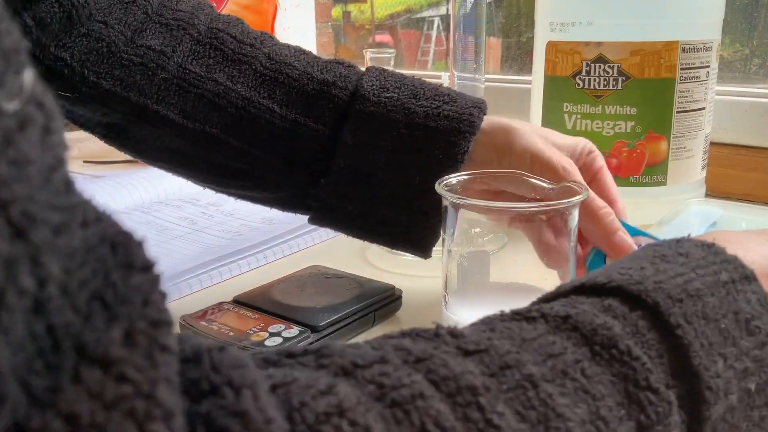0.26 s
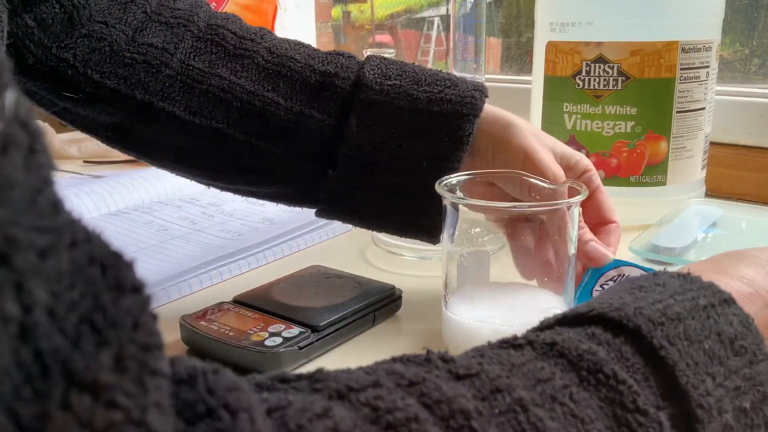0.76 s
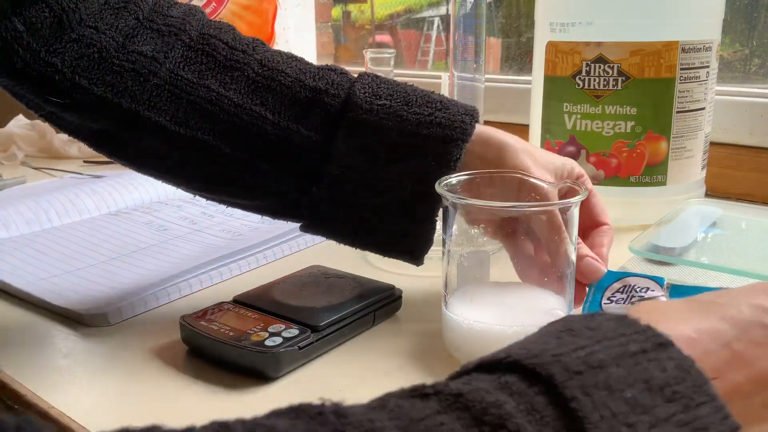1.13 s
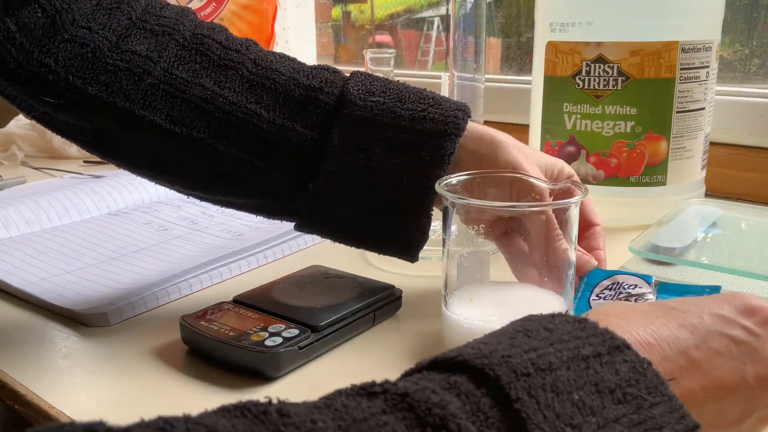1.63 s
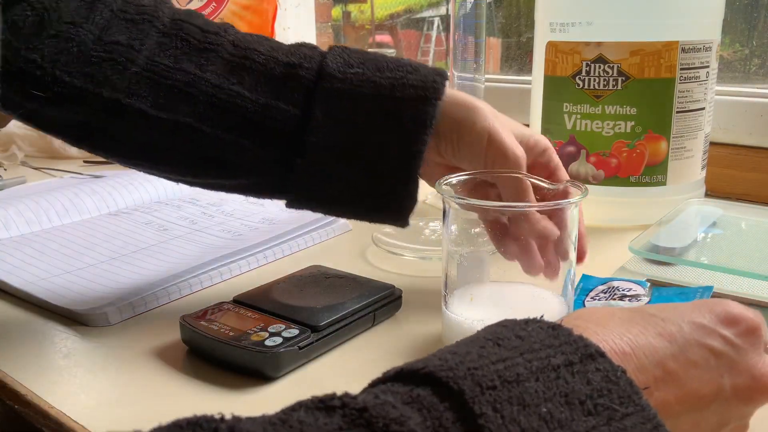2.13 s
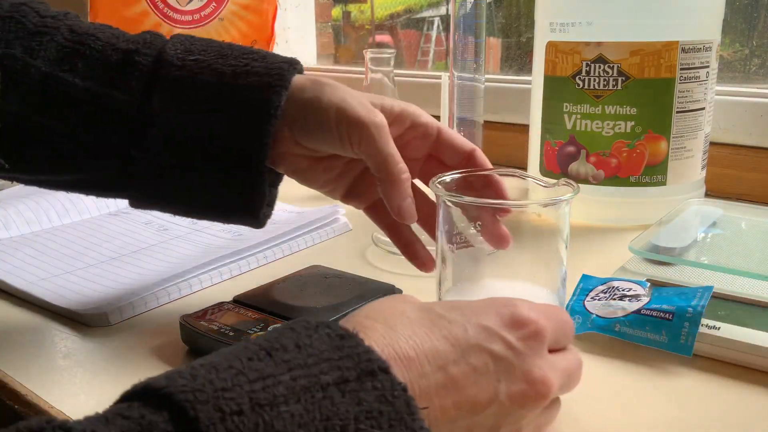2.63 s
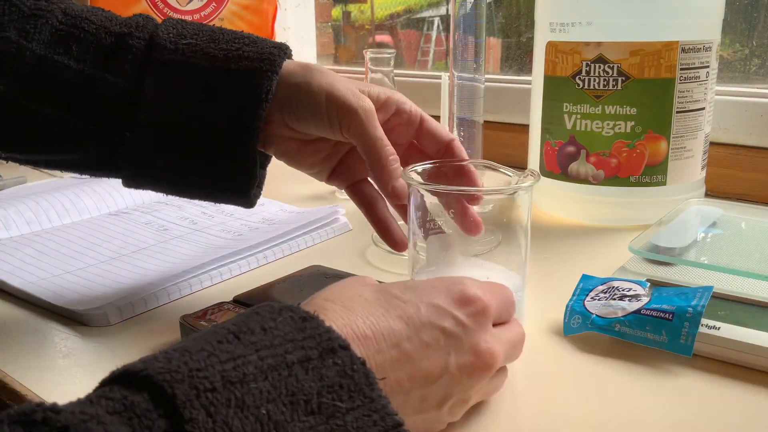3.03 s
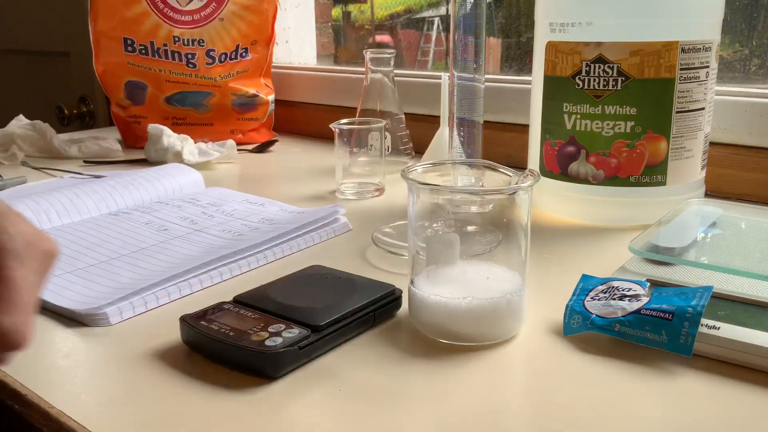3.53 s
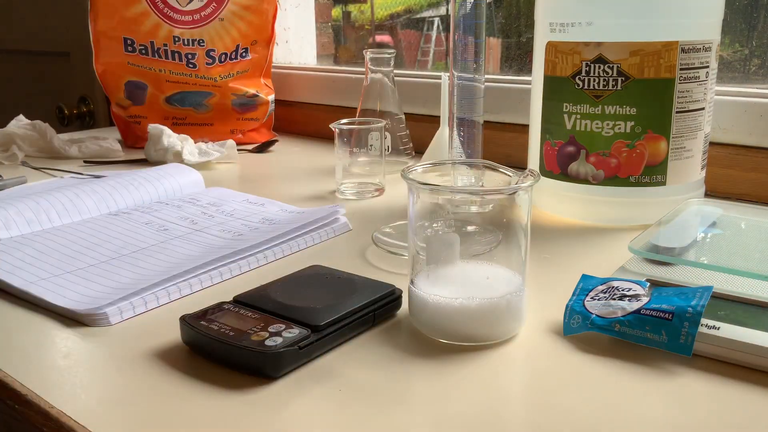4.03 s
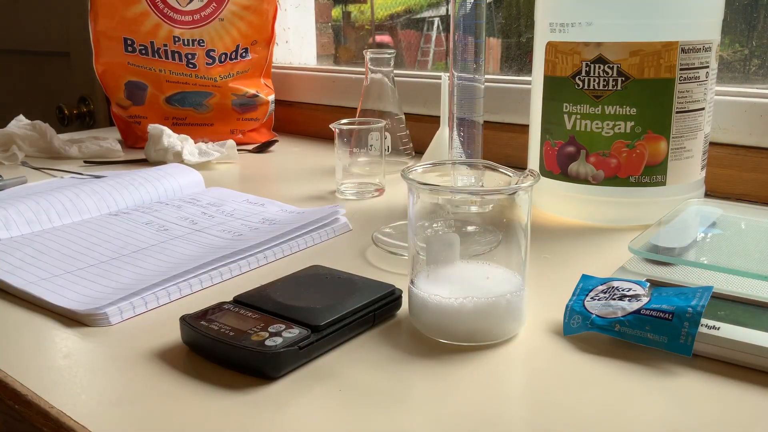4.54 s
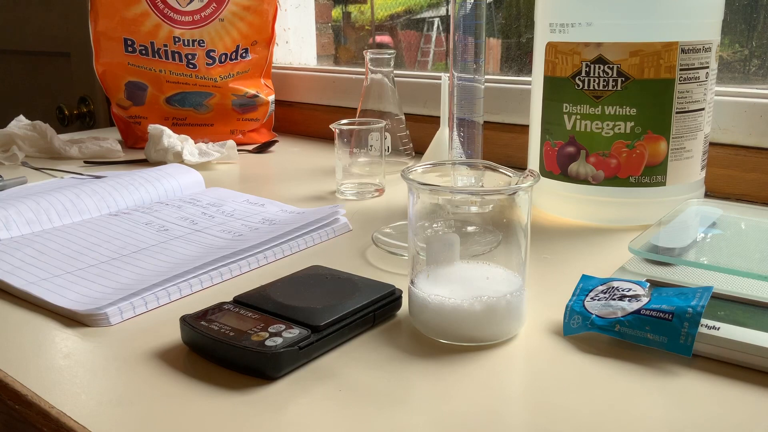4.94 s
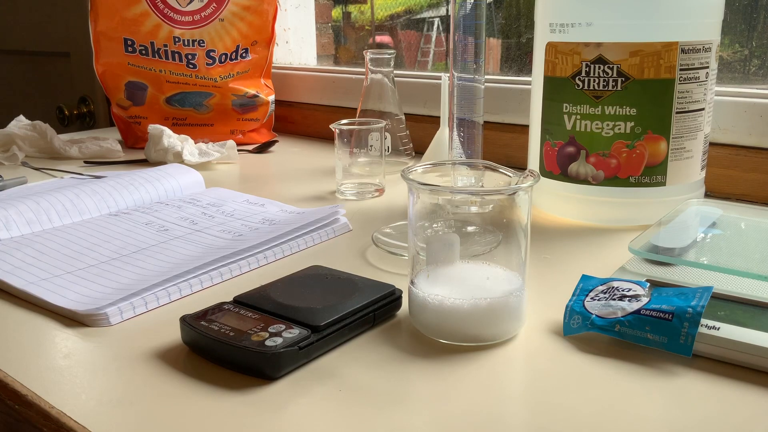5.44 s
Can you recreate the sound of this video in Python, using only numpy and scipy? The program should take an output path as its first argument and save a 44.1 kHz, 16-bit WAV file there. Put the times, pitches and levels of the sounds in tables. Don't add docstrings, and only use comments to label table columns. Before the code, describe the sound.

Fine powder fizzes softly in a glass beaker over a low appliance hum, with faint foil crackles, a brief slide, and one sharp knock.

```python
import sys
import numpy as np
from scipy import signal
from scipy.fft import rfft, irfft, next_fast_len
from scipy.io import wavfile
from scipy.ndimage import uniform_filter1d

SR = 44100
rng = np.random.default_rng(int(sys.argv[2]) if len(sys.argv) > 2 else 0)


def field_ratio(decibels):
    return 10 ** (np.asarray(decibels, dtype=float) / 20)


def int16_out(signal):
    q = np.round(np.clip(np.atleast_2d(signal).T, -1, 1) * 32767)
    wavfile.write(sys.argv[1], SR, q.astype(np.int16))


N = 250929
SIZE = next_fast_len(N + SR)
HZ = np.maximum(np.arange(SIZE // 2 + 1) * SR / SIZE, 1)
TIME = np.arange(N) / SR


# start in seconds, level of the low body in dB,
# level of the small bright parts in dB.
CONTACTS = [(4.431, -28, -50), (4.4365, -30, -55), (4.4425, -26, -45), (4.4559, -0.5, -13),
            (4.4605, -26, 0), (4.4655, -22, -6), (4.473, -17, -9), (4.4785, -22, -10), (4.4845, -25, -16),
            (4.493, -27, -25), (4.509, -29, -26), (4.516, -31, -28), (4.548, -31, -34), (4.576, -30, -38)]
# frequency in Hz, left level in dB, right level in dB, T60 in seconds.
BODY_MODES = [(111, -36, -37, 0.15), (212, -39, -38, .14), (290, -47, -43, .15), (355, -42, -38, .25),
              (420, -47, -44, .25), (540, -18, -28, .06), (584, -16, -30, .065), (605, -42, -32, .3),
              (640, -13, -17, .06), (785, -25, -21, 0.07), (860, -22, -20, .06), (925, -2.5, -2.5, .012),
              (985, -40, -39, .15), (1195, -22, -20, .06), (1600, -24, -37, .04), (1873, -44, -45, .05),
              (2130, -36, -34.5, 0.085), (2750, -44, -38, .03), (3250, -34, -31, 0.039),
              (3700, -34, -33, 0.02), (4115, -29, -29, .035), (4300, -38, -38, .09), (5760, -43, -35, .065),
              (6500, -45, -31, .045), (7150, -44, -36, .05), (8580, -23, -30, .1)]
# frequency in Hz, level in dB.
RATTLE_COLOUR = [(150, -12), (300, -15), (450, -10), (700, -6), (1100, 2), (1500, -6), (2500, -8),
                 (4000, -10), (6000, -20), (8500, -19), (11000, -23.5), (15500, -40)]


def knock():
    near, out = window(4.4, .5), np.zeros((2, N))
    when, low_db, bright_db = np.transpose(CONTACTS)
    at = np.round(when * SR).astype(int) - near.start
    soft_db = -5 * (when < 4.45)
    for hz, left, right, t60 in BODY_MODES:
        heavy, booming = hz < 1400, hz < 450
        lag = int(.001 * SR) * heavy + int(.01 * SR) * booming
        level_db = (low_db if hz < 5000 else bright_db) + soft_db * (hz > 1400)
        clicks = np.zeros(SR // 2)
        clicks[at + lag] = -field_ratio(level_db + rng.normal(0, 1.5, len(at)))
        contact_s = .0012 if heavy else .00019
        push = np.hanning(int(contact_s * SR))
        clicks = signal.lfilter(field_ratio(0.5) * push / push.sum(), 1, clicks)
        if hz > 450:
            radiate = signal.butter(3, .76 * hz, "high", fs=SR, output="sos")
            clicks = signal.sosfilt(radiate, clicks + 1e-18) * field_ratio(1.5)
        r, w = field_ratio(-60 / (t60 * SR)), 2 * np.pi * hz / SR
        ringing = signal.lfilter([.5, 0, -.5], [1, -2 * r * np.cos(w), r * r], clicks)
        out[:, near] += field_ratio(np.c_[[left, right]]) * ringing
    out[:, near] += rattle(TIME[near] - when[:, None], low_db + soft_db, bright_db)
    return signal.sosfilt(signal.butter(2, 90, "high", fs=SR, output="sos"), out + 1e-18)


def rattle(age, low_db, bright_db):
    share, t60 = .75, .08
    colour = field_ratio(at_hz(RATTLE_COLOUR)) * np.array([HZ < 5000, HZ >= 5000])
    shared, own = rng.standard_normal((2, SR // 2))
    scattered = np.array([[share * shared + np.sqrt(1 - share ** 2) * own], [shared]])
    loose = shaped(scattered, colour)[..., :SR // 2]
    decay = np.clip(age / 0.00026, 0, 1) * field_ratio(-60 * np.abs(age) / t60)
    shake = field_ratio(np.array([low_db, bright_db])) @ decay
    return field_ratio(-15.0) * np.sum(shake * loose, axis=1)


# frequency in Hz, width in Hz, level in dB.
COUNTER_MODES = [(450, 53, -0.5), (627, 79, -1), (787, 130, 2), (990, 37, 2.5), (1190, 60, -5),
                 (1450, 120, -12), (1740, 330, -12), (2060, 180, -29)]
# start in seconds, level in dB, length in seconds, pitch in Hz.
STICK_SLIPS = [(2.64, -42, .02, 980), (2.749, -44, 0.011, 796), (2.777, -31.5, 0.016, 747),
               (2.806, -38, 0.023, 780), (2.812, -44, .02, 990), (2.853, -43, 0.014, 1020),
               (2.855, -47, 0.007, 640), (2.897, -53, 0.013, 1090), (2.931, -39, 0.013, 803),
               (2.935, -44, .014, 1006), (2.94, -51.5, .018, 1450), (2.745, -51, .02, 1850),
               (2.8, -51.5, .02, 1850), (2.81, -43, 0.016, 450)]


def slide():
    start, speed_up_s, slow_down_s = 2.58, .22, .25
    near, out = window(start, .5), np.zeros((2, N))
    time = TIME[near]
    grit = rng.standard_normal((2, SR // 2))
    grit[0] = 0.44 * grit[1] + 0.63 * grit[0]
    rub = sum(field_ratio(db) * resonance(grit, hz, width) for hz, width, db in COUNTER_MODES)
    rub = rms_one(signal.sosfilt(signal.butter(6, 2250, fs=SR, output="sos"), rub))
    groan = np.zeros(len(time))
    for slip_at, db, length, hz in STICK_SLIPS:
        age = time - slip_at
        rising = np.sin(2 * np.pi * hz * age * (1 + 1.6 * age))
        groan += field_ratio(db) * burst(age, length, rise=0.0056) * rising
    age = time - start
    ramp = np.minimum(age / speed_up_s, 1 + (speed_up_s - age) / slow_down_s)
    speed = np.sin(np.pi / 2 * np.clip(ramp, 0, 1))
    slow = uniform_filter1d(uniform_filter1d(rng.standard_normal(SR // 2), size=300), size=300)
    uneven_db = 2.5 * rms_one(slow)
    out[:, near] = field_ratio(-48 + uneven_db) * speed ** 1.2 * rub + groan * field_ratio(np.c_[[2.5, -.5]])
    return out


# start in seconds, level in dB, length in seconds,
# ring pitch in Hz, upper limit in Hz.
FOIL_SNAPS = [(.001, -55, .012, 1500, 3970), (.35, -59, .004, 1300, 2000), (.229, -54, .006, 1750, 3000),
              (5.678, -62, .02, 2000, 4000), (.0025, -44, 0.0055, 4700, 11900),
              (0.057, -50.5, 0.0086, 4560, 11000), (0.072, -51.5, 0.017, 4570, 9000),
              (0.171, -41.5, 0.012, 1870, 14000), (0.173, -53, .008, 12600, 14400),
              (0.228, -53.5, .005, 3000, 4450), (0.35, -39.5, 0.0025, 3400, 14700),
              (0.352, -52, .004, 4030, 9000), (.51, -60.5, 0.022, 3340, 5000),
              (0.548, -45, 0.0066, 3320, 6740), (.549, -49.5, 0.0061, 1530, 2200),
              (0.55, -56.5, 0.11, 6150, 11100), (0.56, -52, 0.0031, 950, 2000),
              (0.893, -59, .02, 3040, 3970), (1.066, -55, .003, 3500, 5500), (1.486, -44, .012, 850, 960),
              (2.116, -51.5, .005, 1530, 6500), (2.123, -56, .005, 1530, 5000), ]


def foil():
    shared, own = rng.standard_normal((2, N)) * field_ratio(1.5 * rng.standard_normal(N))
    cracks = rms_one(np.array([0.79 * shared + 0.62 * own, shared]))
    out = np.zeros((2, N))
    for start, level_db, length, ring_hz, high_hz in FOIL_SNAPS:
        low_hz = max(.6 * ring_hz, 2 * ring_hz - high_hz)
        near = window(start, .2)
        age = TIME[near] - start
        sharp_opening = 1 + field_ratio(-4.5) * np.exp(-np.abs(age) / .0008)
        snap = cracks[:, near] * burst(age, length, rise=0.0001) * sharp_opening
        band = signal.sosfilt(signal.butter(3, [low_hz, high_hz], "band", fs=SR, output="sos"), snap)
        fold = field_ratio(7.5) * resonance(snap, ring_hz, width_hz=250)
        out[:, near] += field_ratio(level_db) * (band * np.sqrt(SR / 2 / (high_hz - low_hz)) + fold)
    return out * field_ratio(np.c_[[-1.5, 1.5]])


# frequency in Hz, density in dB per Hz.
COVERED_FIZZ = [(1500, -108), (2100, -102), (2400, -94.5), (2750, -98), (3000, -92.5), (3400, -97),
                (3700, -96), (4200, -97.5), (5000, -99), (5500, -101), (6100, -95.5), (6800, -94.5),
                (7700, -96.5), (9300, -94.5), (10800, -98), (12500, -99.5), (14000, -102), (15800, -105)]
# frequency in Hz, density in dB per Hz.
FREE_FIZZ = [(1500, -108), (2450, -104.5), (2850, -96.5), (3200, -101), (3600, -98), (4200, -92.5),
             (5150, -99), (5500, -93), (5750, -94.5), (6050, -99), (6600, -99), (7700, -97.5), (9000, -95),
             (10200, -97.5), (11200, -102), (12900, -100), (14900, -105), (15700, -114)]
# frequency in Hz, left-right likeness.
COVERED_LIKENESS = [(1500, .45), (2050, .55), (2400, .87), (2570, .93), (2720, .995), (2900, .92),
                    (3450, .8), (3950, .99), (6000, 1), (7200, .69), (7800, 1)]


def fizz():
    gain_db = -.5 + 1.5 * np.exp(-((TIME - 2.95) / .89) ** 2)
    free = np.sin(np.pi / 2 * np.clip((TIME - 1.58) / 2.2, 0, 1)) ** 2
    covered_hiss = np.sqrt(1 - free) * noise_pair(COVERED_FIZZ, COVERED_LIKENESS)
    free_hiss = np.sqrt(free) * noise_pair(FREE_FIZZ)
    return field_ratio(gain_db) * (covered_hiss + free_hiss) + beaker_mouth()


def beaker_mouth():
    hz, width_hz = 5750, 600
    level_db = -70.5 + 10 * burst(TIME - .8, length=1.95, rise=.42)
    bubbles = rng.standard_normal(N)
    mouth = rms_one(resonance(resonance(bubbles, hz, width_hz), hz + 150, width_hz))
    return field_ratio(level_db + np.c_[[-2.5, 2.5]]) * mouth


# multiple of the motor speed, left level in dB, right level in dB.
MOTOR_ORDERS = [(1, 0, 0), (2, -14, -13), (3, -21, -24), (4, -7.5, -11), (5, -40, -33.5), (8, -15, -27),
                (20, -31.5, -31)]
# frequency in Hz, left level in dB, right level in dB.
MAINS_TONES = [(120.03, -54, -54), (240.04, -63, -80)]


def hum():
    motor_hz, sag_db_per_s = 58.905, .56
    turn = 2 * np.pi * (TIME - .026)
    motor, mains = np.zeros((2, 2, N))
    for k, left, right in MOTOR_ORDERS:
        level_db = np.c_[[left, right]] - sag_db_per_s * TIME / k
        motor += field_ratio(level_db) * np.cos(k * motor_hz * turn - 1.3 * k ** 2)
    for hz, left, right in MAINS_TONES:
        mains += field_ratio(np.c_[[left, right]]) * np.cos(hz * turn - 1.205 * round(hz / 60) ** 2)
    settling_db = -4 * np.exp(-TIME / .041)
    return np.sqrt(2) * (field_ratio(-46.5 + settling_db) * motor + mains)


# frequency in Hz, density in dB per Hz.
RUMBLE_SPECTRUM = [(30, -104), (42, -88), (52, -77), (70, -73), (100, -74), (150, -81), (200, -80),
                   (300, -78), (400, -76), (520, -80.5), (580, -84.5), (680, -84), (900, -87), (1300, -94),
                   (2000, -102), (3000, -112)]
# frequency in Hz, width in Hz, left level in dB, right level in dB.
DUCT_MODES = [(385, 3, -65.5, -62), (420, 3, -68, -70), (445, 8, -68, -67), (540, 3.5, -63.5, -67),
              (620, 30, -72, -78), (795, 50, -73, -69), (1020, 50, -85, -72)]


def rumble():
    air = rng.standard_normal(N)
    narrow = np.zeros((2, N))
    for hz, width, left, right in DUCT_MODES:
        narrow += field_ratio(np.c_[[left, right]]) * rms_one(resonance(air, hz, width))
    return noise_pair(RUMBLE_SPECTRUM) + signal.sosfilt(signal.butter(6, 1250, fs=SR, output="sos"), narrow)


def room():
    age = np.arange(SR // 2) / SR
    white = rng.standard_normal((2, len(age)))
    low = signal.sosfilt(signal.butter(2, 1000, fs=SR, output="sos"), white)
    tail = low * field_ratio(-60 * age / .39) + (white - low) * field_ratio(-60 * age / .33)
    tail *= age > .004
    tail /= np.sqrt(np.sum(tail ** 2, axis=1, keepdims=True))
    return rfft(tail, SIZE) / (1 + HZ / 5000)


# frequency in Hz, lead in radians.
DIFFUSE_LEADS = [(0, 0), (120, -0.03), (430, 1.2), (860, 3.5), (1210, 4.5), (1460, 6.5), (1900, 5.1),
                 (2240, 3.5), (2600, 3.2), (2760, 3.0), (3100, 2.4), (3450, 1.2), (3790, .3), (3960, .15),
                 (4310, -0.25), (6290, 0.5), (7240, -1.1), (7750, 0.0), (16000, 0.5)]
# frequency in Hz, left-right likeness.
OPEN_LIKENESS = [(100, 0.99), (150, 0.8), (300, 0.58), (640, 0.69), (900, 0.54), (1200, 1), (1500, 0.43),
                 (2000, 0.45), (2240, .65), (2450, .84), (2750, .87), (3250, .8), (3800, .93), (4300, 0.96),
                 (6000, 1), (7200, 0.9), (7800, 1)]
# frequency in Hz, left over right in dB.
PORT_TILT = [(70, 0), (150, 0), (300, 3), (400, -2), (540, 5.5), (800, 1.5), (1100, -2), (2000, -1.5),
             (3300, -2), (4300, 0), (6300, -2), (8000, -0.5)]


def noise_pair(spectrum, likeness=OPEN_LIKENESS):
    shared, own = rfft(rng.standard_normal((2, SIZE)))
    alike = np.clip(at_hz(likeness), 0, 1)
    left = alike * shared + np.sqrt(1 - alike ** 2) * own
    both = np.array([left, shared]) * ports(DIFFUSE_LEADS)
    level_db = at_hz(spectrum) + at_hz(PORT_TILT) * [[.5], [-.5]]
    return irfft(both * field_ratio(level_db) * np.sqrt(SR / 2), SIZE)[:, :N]


def ports(leads):
    lead = np.interp(HZ, *np.transpose(leads))
    return np.exp(1j * np.array([lead, 0 * lead]))


def resonance(x, hz, width_hz):
    r = np.exp(-np.pi * width_hz / SR)
    poles = [1, -2 * r * np.cos(2 * np.pi * hz / SR), r * r]
    return signal.lfilter(np.array([1, 0, -1]) * (1 - r * r) / 2, poles, x + 1e-18)


def burst(age, length, rise):
    return np.clip(age / rise, 0, 1) * np.exp(-np.clip(age / length, 0, 9) ** 2)


def rms_one(x):
    return x / np.sqrt(np.mean(x ** 2) + 1e-20)


def at_hz(points):
    hz, value = np.transpose(points)
    return np.interp(np.log(HZ), np.log(hz), value)


def shaped(x, response):
    return irfft(rfft(x, SIZE) * response, SIZE)[..., :N]


def window(start, length):
    first = max(int(start * SR), 0)
    return slice(first, first + int(length * SR))


# frequency in Hz, lead in radians.
ON_COUNTER_LEADS = [(0, 0), (780, 1.6), (1030, 3.9), (1720, 6.4), (2500, 3.3), (4390, -0.2), (6890, 0.2),
                    (7320, 1.0), (7750, 0.0), (16000, -0.1)]
# frequency in Hz, lead in radians.
KNOCK_LEADS = [(0, 0), (1640, 5.3), (2150, 3.3), (2840, 2.2), (3530, 0.9), (6460, -1.3), (7410, 0.6),
               (7840, -0.3), (8790, 0.1), (16000, -0.0)]


def scene():
    tail = field_ratio(-10) * room()
    on_counter = shaped(foil() + slide(), ports(ON_COUNTER_LEADS) + tail)
    knocked = shaped(knock(), ports(KNOCK_LEADS) + tail)
    return hum() + rumble() + fizz() + on_counter + knocked


def top_cut(x):
    return signal.sosfilt(signal.butter(12, 16490, fs=SR, output="sos"), x)


def record(dry):
    stretch_s = .046
    mood = rng.random(int(N / SR / stretch_s) + 1)[(TIME / stretch_s).astype(int)]
    wavering = np.abs(TIME - 3.55) < .23
    lower_share = np.where(TIME < 4.5, .04 + .5 * wavering, .85)
    lower = uniform_filter1d(1. * (mood < lower_share), size=400)
    mix = (1 - lower) * shaped(dry, HZ < 15760) + lower * shaped(dry, HZ < 15150)
    return top_cut(mix)


dry = scene()
out = record(dry)
int16_out(out)
```